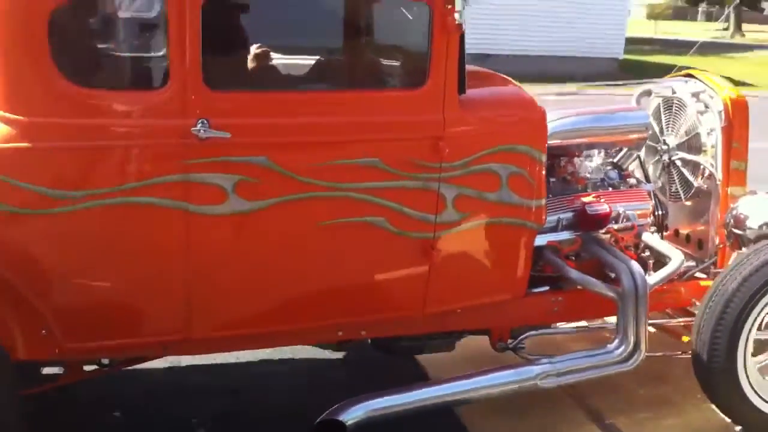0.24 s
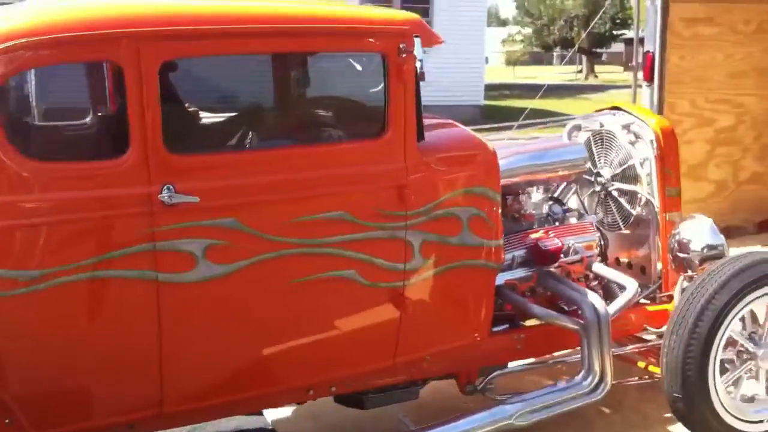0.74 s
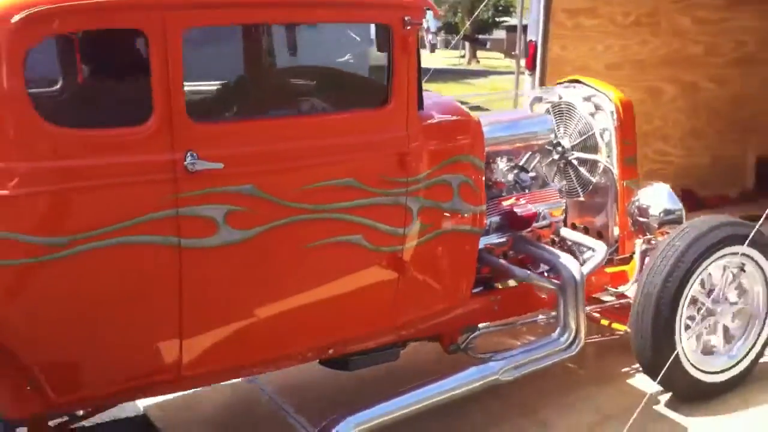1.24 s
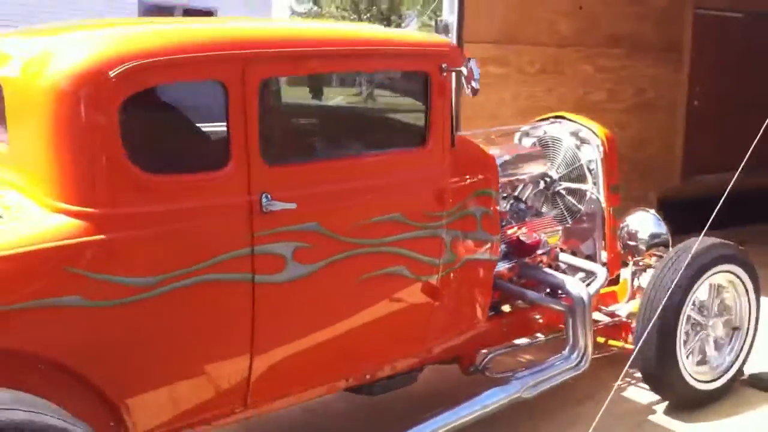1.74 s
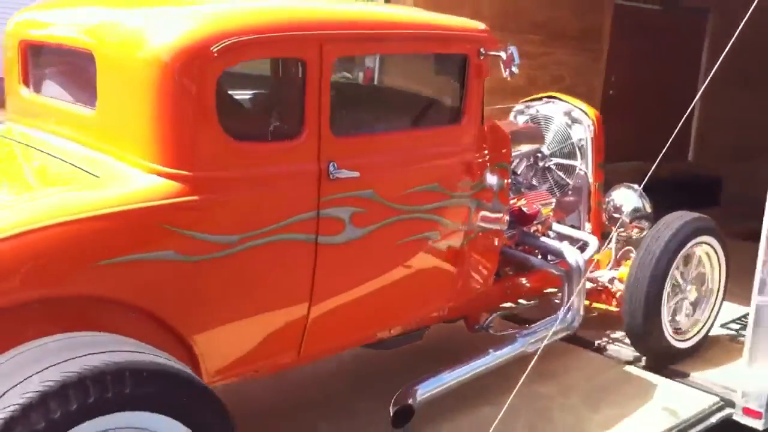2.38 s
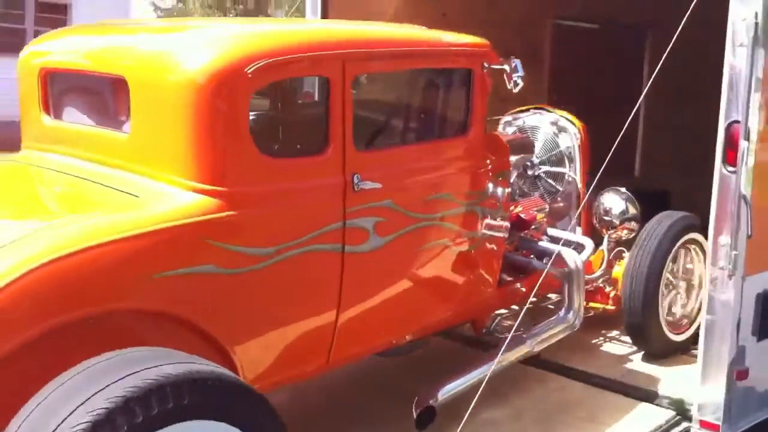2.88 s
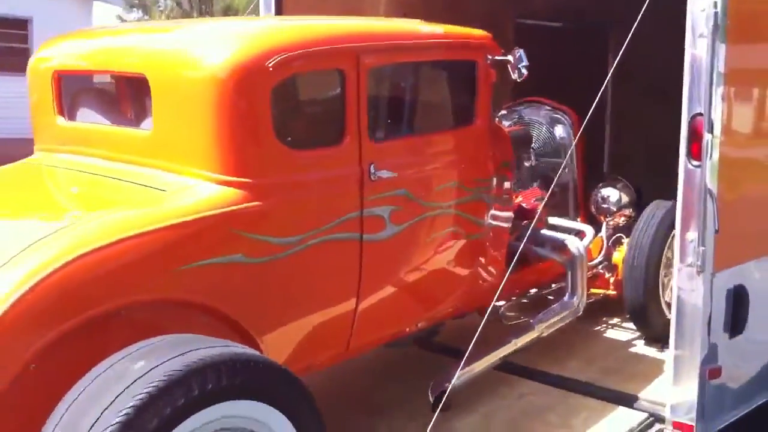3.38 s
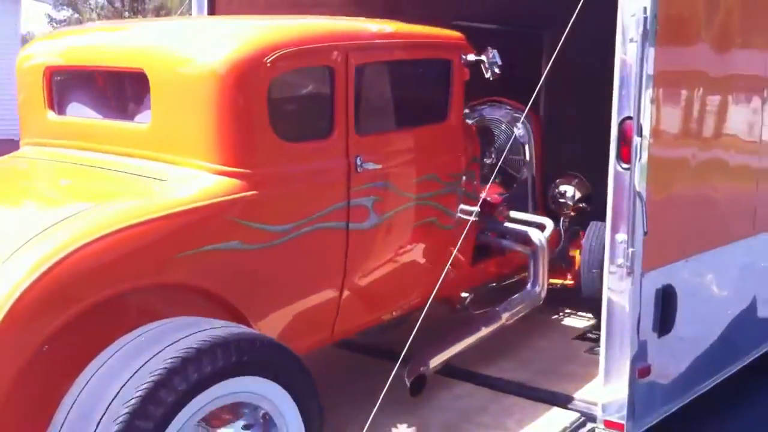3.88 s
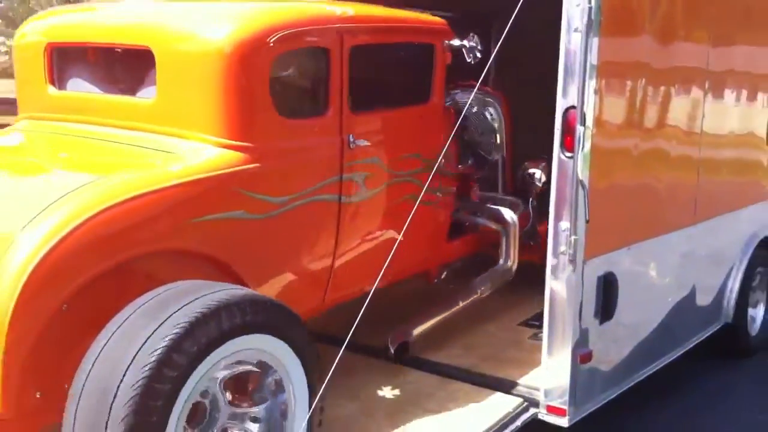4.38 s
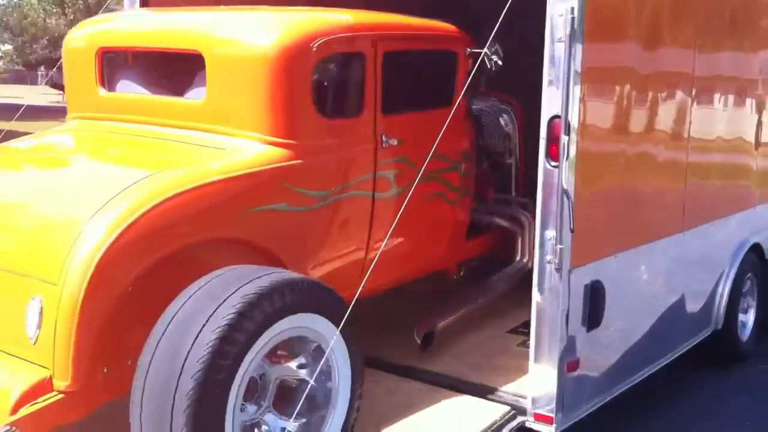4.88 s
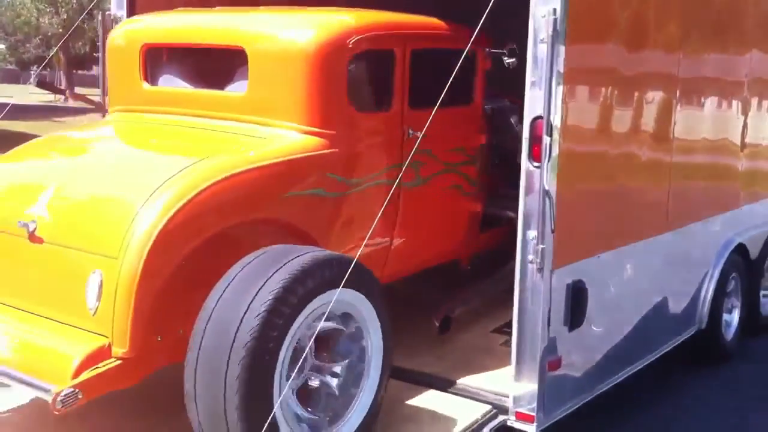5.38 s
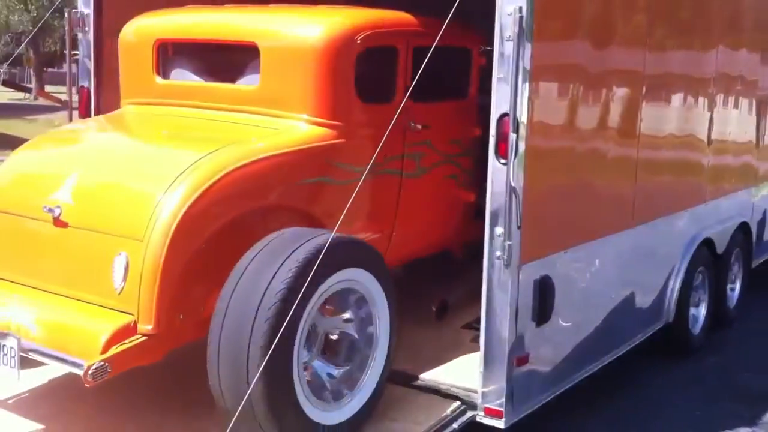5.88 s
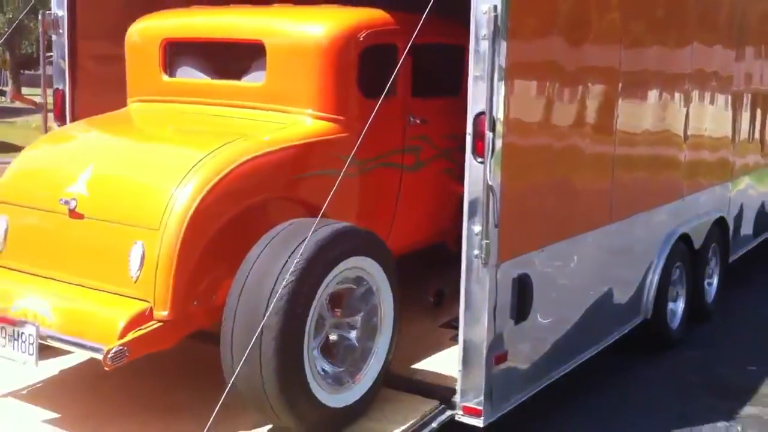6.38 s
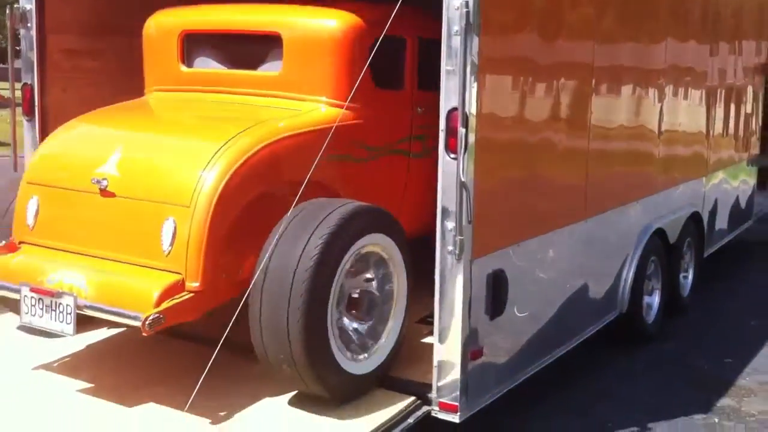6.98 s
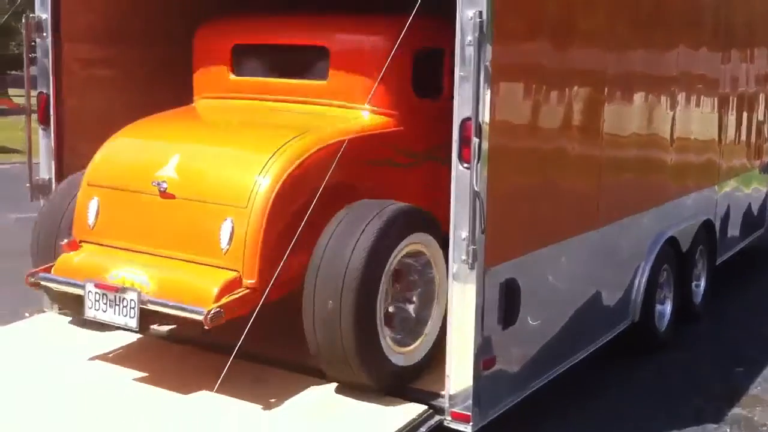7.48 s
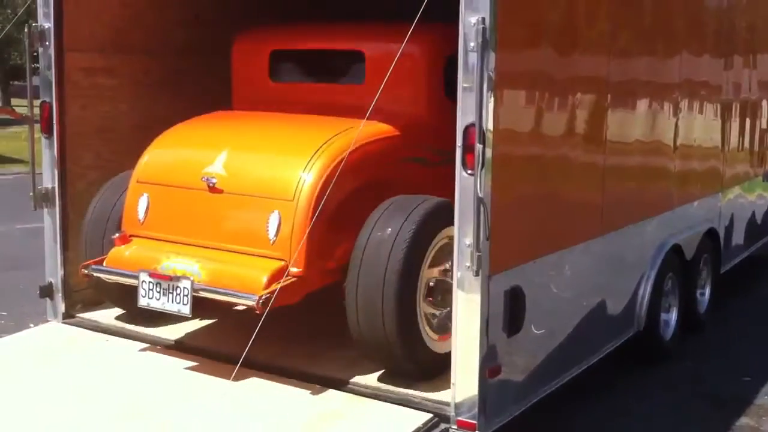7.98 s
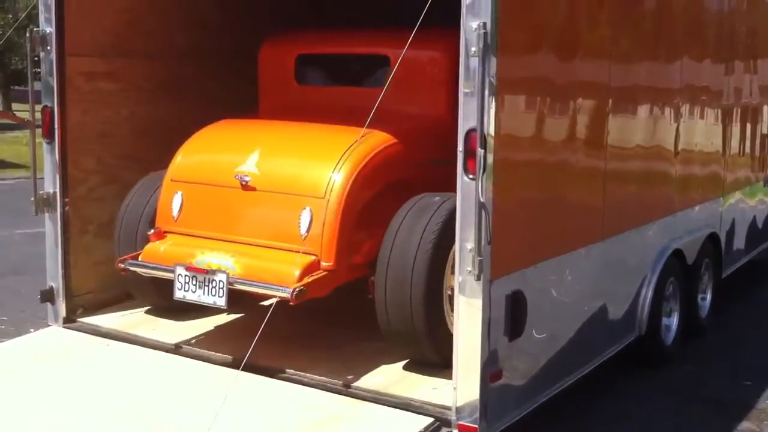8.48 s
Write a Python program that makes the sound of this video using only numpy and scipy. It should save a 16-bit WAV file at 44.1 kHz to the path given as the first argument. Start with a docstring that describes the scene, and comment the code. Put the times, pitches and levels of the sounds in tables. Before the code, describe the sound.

A hot rod's open side pipes pop and bark in a choppy, surging idle, growing boxier and more rumbling as it creeps into a trailer.

```python
"""A hot rod with open side pipes creeps into an enclosed trailer on a choppy, surging idle.
Each firing spits a hiss of gas, barks as rough noise and booms through the pipe's resonances.
The engine surges several times a second; distinct firings, from small puffs to loud cracks, stand out,
the ordinary ones just before them weak.
As the car moves inside, the walls' growing echo smears the pops into a rumble. The ramp knocks once."""
import sys
import numpy as np
from scipy import signal
from scipy.fft import rfft, irfft, next_fast_len
from scipy.io import wavfile
from scipy.ndimage import uniform_filter1d, minimum_filter1d

SR = 44100
rng = np.random.default_rng(int(sys.argv[2]) if len(sys.argv) > 2 else 0)


def transcribe(signal):
    """Save signal, clipped to [-1, 1], as a 16-bit WAV file at the path in sys.argv[1]."""
    frames = np.atleast_2d(signal).T
    limited = np.clip(frames, -1, 1)
    pcm = np.round(limited * 32767).astype(np.int16)
    wavfile.write(sys.argv[1], SR, pcm)


N = 385434

# colour of the walls' answer: (frequency [Hz], gain [dB])
WALL_COLOUR = [(70, 3), (150, -1), (220, -0.5), (350, 1.5), (520, 6), (700, 0), (1300, 2.5), (3000, -2),
               (9000, 0), (15000, -16)]
# how fast the trailer's echo dies: (frequency [Hz], time to fall 60 dB [s])
TRAILER_DECAY = [(150, 0.27), (500, 0.13), (2000, 0.13), (12000, 0.1)]
# the way into the trailer: (time [s], wall answer [dB], spit of the ordinary firings [dB],
# brightness of the pipe mouth [dB], gas hiss [dB])
WAY_INSIDE = [(0, -19.5, 0, 4, -0.5), (1.2, -19.5, -2.5, 2, -0.5), (3, -13, -3, 1, -2),
              (4.3, -15, -2.5, -2.5, -1.5), (6.1, -10, -3, -1.5, 0.5), (7.4, -7.5, -6.5, -1.5, 1.5),
              (8.7, -7, -10.5, 0, 1)]
# a knock as the car rolls over the ramp: (time [s], level [dB])
RAMP_KNOCKS = [(3.063, -7.5)]
# tones of the struck ramp: (frequency [Hz], level [dB], time to fall 60 dB [s])
RAMP_TONES = [(649, -0.5, 0.041), (1230, -13, 0.049), (1601, -15, 0.018), (2270, -17, 0.052)]
# colour of the steady flow of gas: (frequency [Hz], relative level per Hz [dB])
GAS_COLOUR = [(900, 10), (1600, 9), (2300, 9.5), (5000, 3.5), (7500, 5), (11000, -0.5), (16000, -16)]
# whistling bands of a firing's spit: (centre [Hz], width [Hz], level [dB])
SPIT_BANDS = [(4070, 380, -19), (8330, 2630, -6.5), (11360, 2700, -10), (13000, 2400, -7.5)]
# the low throat of the bark: (frequency [Hz], relative level per Hz [dB])
THROAT_COLOUR = [(450, -79), (710, -1), (860, 0), (1080, -2.5), (1320, -4), (1550, -19.5), (3000, -16.5)]
# the brassy edge of the bark: (frequency [Hz], relative level per Hz [dB])
EDGE_COLOUR = [(900, -22), (1550, -3.5), (2080, 0), (2700, -5), (3450, -9.5), (5000, -9.5), (9000, -12)]
# exhaust pipe resonances: (frequency [Hz], width [Hz], relative level [dB])
PIPE_RESONANCES = [(107, 10, -33), (174, 39.6, 13.5), (226.6, 9.5, -6.5), (371, 30, -8.5), (435, 51, -4),
                   (515, 20, -24)]
# crosswise tones of the pipe, before each firing varies them:
# (frequency [Hz], level [dB], time to fall 60 dB [s])
CROSS_TONES = [(1285, -7, 0.037), (2165, -6.5, 0.027), (2807, -17, 0.033), (3202, -8, 0.042)]
# the idle between surges: (time [s], level [dB])
IDLE_LEVEL = [(0, -25), (.9, -25), (1.5, -28), (2.3, -25), (3.1, -24), (3.7, -26), (4.6, -26), (5.4, -23),
              (6.5, -20.5), (7.1, -28), (7.7, -24.5), (8.7, -23)]
# the engine catches and surges: (time of full strength [s], hold [s], rise [s], level [dB], extra rasp [dB])
ENGINE_SURGES = [(0, 0.031, 0.02, -15, 5.5), (0.156, 0.052, 0.045, -14, 5),
                 (0.328, 0.072, 0.019, -21, -2.5), (0.467, 0.074, 0.021, -16, 1),
                 (0.741, 0.056, 0.038, -14, 4.5), (0.951, 0.031, 0.022, -19, 7),
                 (1.049, 0.2, 0.043, -12, 1.5), (1.344, 0.0092, 0.018, -18, -2),
                 (1.689, 0.035, 0.058, -13, -2), (1.82, .02, .03, -19, 3), (1.902, .22, 0.097, -14, -2),
                 (2.355, 0.075, 0.041, -13, -1.5), (2.57, 0.073, 0.052, -16, -1.5),
                 (2.778, 0.29, 0.054, -13, -4.5), (3.338, 0.17, 0.065, -12, -3),
                 (3.799, 0.14, .04, -14, -2), (4.019, 0.073, 0.031, -16, -3),
                 (4.281, 0.14, 0.068, -12, -2.5), (4.697, 0.23, 0.039, -14, -1),
                 (5.011, .11, 0.041, -18, -1), (5.224, 0.087, .06, -11, 4.5),
                 (5.579, 0.076, 0.058, -13, 3.5), (5.87, .25, 0.054, -14, 1), (6.323, 0.091, .07, -15, 2),
                 (6.589, .11, 0.071, -13, 1.5), (6.768, 0.097, 0.044, -11, 1), (7.28, 0.0803, .1, -20, 2),
                 (7.48, .05, .16, -13, 0.5), (7.839, .08, .1, -13, 2.5), (8.299, 0.063, .14, -12, 0.5),
                 (8.679, 0.053, 0.14, -9, -0.5)]
# eight cylinders in firing order: (blows through the near pipe [1 = yes, 0 = no])
NEAR_CYLINDERS = [1, 0, 1, 0, 0, 1, 0, 1]
# distinct firings from the near pipe, from small idle puffs to loud cracks:
# (time [s], thump [dB], bark [dB], spit [dB], pitch of the bark [Hz])
DISTINCT_FIRINGS = [(.13, -13, -26.5, -22, 740), (0.1643, -11, -15.5, -19, 2210),
                    (0.1849, -4.5, -16, -16, 2230), (.2186, -9, -17, -23, 2200),
                    (0.2361, -12, -14, -22, 2420), (.465, -8, -14, -19, 2030),
                    (0.5047, -8.5, -23, -13, 3410), (0.5241, -7, -11.5, -16, 2180),
                    (.666, -19, -26.5, -18.5, 1330), (0.7123, -16.5, -26, -20, 3167),
                    (.738, -12, -10.5, -14, 3465), (0.7747, -6.5, -11.5, -17, 2010),
                    (0.9778, -13, -32, -15.5, 748), (1.027, -11, -23, -14.5, 2575),
                    (1.0493, -1.5, -7.5, -5, 3282), (1.1334, -8.5, -17, -26, 1332),
                    (1.2117, 1, -11.5, -13, 751), (1.5386, -23, -33, -18.5, 2878),
                    (1.5928, -14.5, -30, -16.5, 1770), (1.629, -25, -27, -15.5, 3674),
                    (1.6813, -13, -22, -16, 3684), (1.708, -8.5, -13, -17.5, 2130),
                    (1.7866, -12, -28, -22, 4316), (1.8467, -10, -23, -12, 4150),
                    (1.886, -11, -23, -19.5, 2800), (1.908, -5, -17.5, -17.5, 2780),
                    (1.9198, -6, -18.5, -19, 2800), (2.006, -6, -43, -20, 739),
                    (2.0645, -3.5, -24, -13, 753), (2.084, -8, -19, -17, 745),
                    (2.0959, -1.5, -23, -17, 748), (2.114, -16, -20.5, -19, 2820),
                    (2.338, -13, -25, -17, 2870), (2.3607, -10, -17, -18, 2282),
                    (2.3749, -5, -22, -20, 2683), (2.3952, -11, -16.5, -25, 2724),
                    (2.451, -10.5, -22, -22.5, 2700), (2.577, -12, -16, -21, 2840),
                    (2.6354, -11, -20.5, -18.5, 2594), (2.767, -7, -15.5, -18.5, 938),
                    (2.8214, -4.5, -11, -21, 3930), (3.3135, -12, -30, -19, 969),
                    (3.3347, -4, -9, -12, 1030), (3.3673, -9, -19.5, -16.5, 2937),
                    (3.4155, -2, -18, -18, 4214), (3.4909, -16, -18.5, -23, 1000),
                    (3.794, -9.5, -18, -18.5, 2980), (3.8335, -11, -26, -20, 3646),
                    (3.8543, -3.5, -14, -21, 3763), (3.884, -9, -21, -20, 753),
                    (4.0952, -13.5, -29, -24.5, 3850), (4.1066, -13, -31, -25, 1000),
                    (4.1656, -16.5, -31, -23, 1118), (4.2006, -12, -27.5, -20, 1025),
                    (4.2244, -13.5, -27, -18, 4023), (4.292, -8, -25, -19, 749),
                    (4.311, -15, -23, -16, 974), (4.3431, -2.5, -15.5, -15.5, 1172),
                    (4.3582, -3.5, -16, -13, 4275), (4.3846, -6, -22, -19, 997),
                    (4.4255, -7.5, -23, -23, 1390), (4.7264, -22, -21, -22, 927),
                    (4.7802, -17, -25, -19.5, 3243), (5.2485, -10.5, -18, -16, 2969),
                    (5.61, -11, -12.5, -24, 831), (6.0689, -4, -16.5, -13, 852.5),
                    (6.3331, -11, -15, -18.5, 876.5), (6.5848, -6.5, -14, -13, 755),
                    (7.1713, -20, -40, -27, 752)]

TOP_HZ = 16000
COAST_S = .05  # a surge takes this much longer to die than to rise
FIRING_HZ = 71.81  # firings per second at idle
CLIMB_HZ_PER_DB = 1.6  # extra firings per second for each dB of surge


def amp(db):
    """Turn decibels into a multiplier."""
    return 10 ** (np.asarray(db) / 20)


def unit(x):
    """Scale a sound to an average (rms) strength of 1."""
    return x / np.sqrt(np.mean(x ** 2) + 1e-20)


def along(points, hz):
    """Read (frequency, value) points on a logarithmic frequency axis."""
    f, values = np.transpose(points)
    return np.interp(np.log(hz + 1), np.log(f), values)


def curves(rows):
    """Give one value per sample for each column after the time."""
    s, *columns = np.transpose(rows)
    return [np.interp(np.arange(N) / SR, s, column) for column in columns]


def filtered(x, response):
    """Multiply a sound's spectrum by a response that depends on frequency."""
    m = next_fast_len(N + SR // 2)
    hz = np.fft.rfftfreq(m, 1 / SR)
    return irfft(rfft(x, m) * response(hz), m)[:N]


def noise(spectrum):
    """Colour random noise and scale it to rms 1."""
    return unit(filtered(rng.standard_normal(N), lambda hz: amp(along(spectrum, hz))))


def kicks(times, sizes):
    """Place one single-sample push at each time."""
    samples = np.clip(np.round(times * SR).astype(int), 0, N - 1)
    return np.bincount(samples, sizes, N)


def place(times, sizes, rings):
    """Add one short ring, scaled to its size, at each time."""
    where = np.round(times * SR).astype(int)[:, None] + np.arange(rings.shape[1])
    return np.bincount(where.ravel(), (sizes[:, None] * rings).ravel(), N)[:N]


def vary(sizes, spread_db):
    """Make the firings unequal in strength, at random."""
    return sizes * amp(spread_db * np.tanh(rng.standard_normal(len(sizes))))


def puffs(times, sizes, rise, fall):
    """Loudness outline of gas puffs: each swells up to its time and dies after it; overlaps add as power."""
    t = np.arange(-SR // 20, SR // 20) / SR
    power = np.exp(2 * np.minimum(t / rise, -t / fall))
    return np.sqrt(np.abs(signal.fftconvolve(kicks(times, sizes ** 2), power, 'same')))


def outdoor_rumble(level_db=-50):
    """A faint, steady outdoor rumble made of low-pitched noise."""
    return amp(level_db) * noise([(20, -13), (80, 22), (400, -29), (4000, -43)])


def trailer(x, echoes=18):
    """The plywood walls answer, boxy and dull; the echo pattern changes as car and listener move."""
    out = np.zeros(N + SR)
    for k in range(echoes):
        hz, t, grains = signal.stft(rng.standard_normal(SR // 3), SR, nperseg=256)
        decay = amp(-60 * t / along(TRAILER_DECAY, hz)[:, None])
        tail = signal.istft(grains * decay, SR, nperseg=256)[1]
        tail = np.pad(tail / np.linalg.norm(tail), (550, 0))  # echo starts about 12 ms late
        # each echo pattern fades into the next
        share = 1 - np.abs(np.arange(N) / N * (echoes - 1) - k)
        part = np.flatnonzero(share > 0)
        echo = signal.fftconvolve(x[part] * np.sqrt(share[part]), tail)
        out[part[0]:][:len(echo)] += echo
    return filtered(out[:N], lambda hz: amp(along(WALL_COLOUR, hz)))


def ramp():
    """The ramp knocks under the car's weight: a few tones ring and die away."""
    t = np.arange(SR // 4) / SR
    ring = sum(amp(db - 60 * t / t60) * np.sin(2 * np.pi * hz * t) for hz, db, t60 in RAMP_TONES)
    s, db = np.transpose(RAMP_KNOCKS)
    return signal.fftconvolve(kicks(s, amp(db)), ring)[:N]


def effort():
    """Engine level, its rise above idle and extra rasp, in dB: each surge rises, holds and coasts down."""
    t = np.arange(0, N, 40) / SR
    idle = np.interp(t, *np.transpose(IDLE_LEVEL))
    lift, rasp = np.zeros((2, len(t)))
    for s, hold, rise, db, rasp_db in ENGINE_SURGES:
        rising = 1 + (t - s) / rise
        coasting = 1 - (t - s - hold) / (rise + COAST_S)
        shape = np.clip(np.minimum(rising, coasting), 0, 1)
        lift = np.maximum(lift, shape * (db - idle))
        rasp = rasp + shape * rasp_db
    return curves(np.transpose([t, idle + lift, lift, rasp]))


def firings(lift, stumble=.16, misfire=.25, misfire_db=-11, starved_s=0.016):
    """Ordinary firings, quicker in a surge: times, whether each leaves by the near pipe, strengths in dB."""
    turns = np.cumsum(FIRING_HZ + CLIMB_HZ_PER_DB * lift) / SR  # firings due so far
    k = np.arange(1200)
    due = k + stumble * rng.standard_normal(len(k))
    s = np.interp(due, turns, np.arange(N) / SR)
    to_distinct = np.transpose(DISTINCT_FIRINGS)[0] - s[:, None]
    # a miss is a weak firing: likelier at idle, and certain just before a distinct firing
    missed = rng.random(len(k)) < misfire * amp(-np.interp(due, turns, lift))
    missed |= ((to_distinct > 0) & (to_distinct < starved_s)).any(axis=1)
    # leave out ordinary firings that nearly coincide with a distinct one
    clear = np.abs(to_distinct).min(axis=1) > .5 / FIRING_HZ
    keep = clear & (due > 0) & (due < turns[-1])
    return s[keep], np.take(NEAR_CYLINDERS, k[keep], mode='wrap'), misfire_db * missed[keep]


def spitting(times, sizes, rise, fall):
    """Gas jets from the pipe: bands of hissing noise, mixed differently in each puff."""
    out = 0
    for hz, width, db in SPIT_BANDS:
        band = unit(filtered(rng.standard_normal(N), lambda f: np.exp(-.5 * ((f - hz) / width) ** 2)))
        out = out + amp(db) * band * puffs(times, vary(sizes, spread_db=7.0), rise, fall)
    return out


def rasping(times, sizes, rise, fall, throat_lag=0.00055, throat_rise=0.006):
    """Turbulence at the pipe mouth: a quick edge, then the throat; their balance follows the brightness."""
    bright = amp(curves(WAY_INSIDE)[2])
    edge = noise(EDGE_COLOUR) * puffs(times, vary(sizes, spread_db=3), rise, fall)
    throat = noise(THROAT_COLOUR) * puffs(times + throat_lag, vary(sizes, spread_db=3), throat_rise, fall)
    return (throat / bright + edge * bright) / np.hypot(bright, 1 / bright)


def twang(times, sizes, spread_db=4, detune=0.0746):
    """Every slug of hot gas rings the pipe's crosswise tones at its own strengths and pitches."""
    t = np.arange(SR // 25) / SR
    rings = 0
    for hz, db, t60 in CROSS_TONES:
        level, pitch = rng.standard_normal((len(times), 2)).T[:, :, None]
        strength = amp(db + spread_db * np.tanh(level)) * amp(-60 * t / t60)
        rings = rings + strength * np.sin(2 * np.pi * hz * (1 + detune * pitch) * t)
    rings = rings * (1 - np.exp(-t / .0003))  # soften the start
    return place(times, sizes, rings)


def yelps(times, sizes, pitches, t60=0.023, attack=0.00064, wander=0.011):
    """The bark of a distinct firing rings briefly at a wavering pitch of its own."""
    t = np.arange(SR // 25) / SR
    drift = wander * np.cumsum(rng.standard_normal((len(times), len(t))), axis=1)
    tone = np.sin(2 * np.pi * (pitches[:, None] * t + drift))
    return place(times, sizes, tone * amp(-60 * t / t60) * (1 - np.exp(-t / attack)))


def pipe(x, low_hz=140, high_hz=575, steepness=20):
    """The pipe rings at its resonances; its open end gives off little deep bass, and the treble is cut."""
    def response(f):
        modes = sum(amp(db) * 1j * f * w / (c * c - f * f + 1j * f * w) for c, w, db in PIPE_RESONANCES)
        return modes * f / np.hypot(low_hz, f) / np.sqrt(1 + (f / high_hz) ** steepness)
    # scale so that one push of size 1 rings with energy 1
    ring = filtered(kicks(np.array([.01]), np.ones(1)), response)
    return filtered(x, response) / np.linalg.norm(ring)


def lope(boom_db=-1, rasp_db=-16.5, twang_db=-15, hiss_db=-28.0, spit_db=-23.0,
         hiss_grows=0.53, spit_grows=0.57,  # dB per dB of engine level
         far_boom_db=-1.5, far_rasp_db=-4, far_spit_db=-19, churn=0.43, lead_s=0.023, thin_hz=7000):
    """Ordinary firings boom, rasp and spit; the spit leads each surge, the body shades the far treble."""
    level, lift, rasp = effort()
    _, spit, _, hiss = curves(WAY_INSIDE)
    t = np.arange(N) / SR
    ahead = np.interp(t + lead_s, t, level)
    s, near, strength = firings(lift)
    far = 1 - near

    pushes = unit(kicks(s, vary(amp(far_boom_db * far + strength), spread_db=4.5)))
    boom = pipe((pushes + churn * rng.standard_normal(N)) * amp(level + boom_db))

    bark = vary(amp(far_rasp_db * far + strength), spread_db=4)
    rough = amp(rasp_db) * unit(rasping(s, bark, rise=0.0015, fall=0.0098))
    barks = amp(level + rasp) * (rough + amp(twang_db) * twang(s, bark))

    spit_sizes = vary(amp(far_spit_db * far + strength), spread_db=0.5)
    spits = spitting(s, spit_sizes, rise=.0009, fall=0.004)
    thin = unit(filtered(spits, lambda f: f / np.hypot(f, thin_hz)))
    jets = amp(spit_grows * ahead + spit_db + spit) * thin

    gas_flow = amp(hiss_grows * level + hiss_db + hiss) * noise(GAS_COLOUR)
    return boom + barks + jets + gas_flow


def near_pops(thump_db=24, bark_db=-1, twang_db=-4, yelp_db=4, spit_db=3, churn_db=-29):
    """A valve opens on a distinct firing: gas spits and barks, then the pressure wave rings the pipe."""
    s, thump, bark, spit, pitch = np.transpose(DISTINCT_FIRINGS)
    wave = s + .0014  # the thump follows a moment later
    churn = amp(churn_db) * puffs(wave, amp(thump), rise=0.00061, fall=0.0072) * rng.standard_normal(N)
    boom = amp(thump_db) * pipe(kicks(wave, amp(thump)) + churn)
    rasp = amp(bark_db) * rasping(s, amp(bark), rise=.0009, fall=0.0062)
    ring = amp(twang_db + curves(WAY_INSIDE)[2]) * twang(s, amp(bark))
    yelp = amp(yelp_db) * yelps(s, amp(bark), pitch)
    jet = amp(spit_db) * spitting(s, amp(spit), rise=0.0011, fall=0.0035)
    return boom + rasp + ring + yelp + jet


def scene():
    """Add the exhaust and ramp, the trailer's answer to them, and the outdoor rumble."""
    car = near_pops() + lope() + ramp()
    walls = trailer(car * amp(curves(WAY_INSIDE)[0]))
    return (car + walls + outdoor_rumble())[None]


def record(dry, ceiling=0.91):
    """A fast limiter turns down the loudest pops; then everything above the top frequency is removed."""
    need = np.minimum(1, ceiling / (np.abs(dry[0]) + 1e-9))
    gain = uniform_filter1d(minimum_filter1d(need, size=300), size=200)  # sizes in samples
    return filtered(dry[0] * gain, lambda hz: hz < TOP_HZ)[None]


dry = scene()
out = record(dry)
transcribe(out)
```